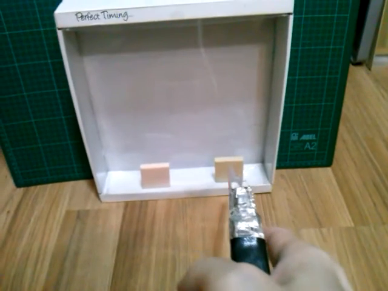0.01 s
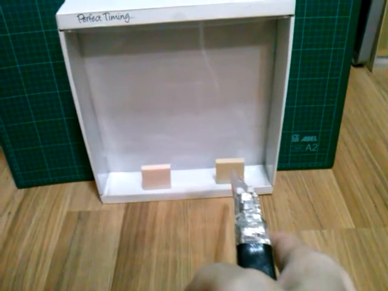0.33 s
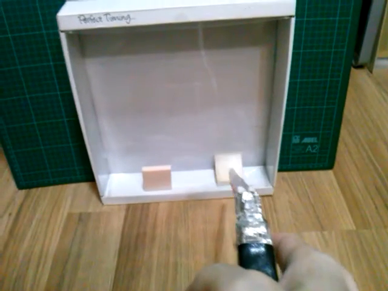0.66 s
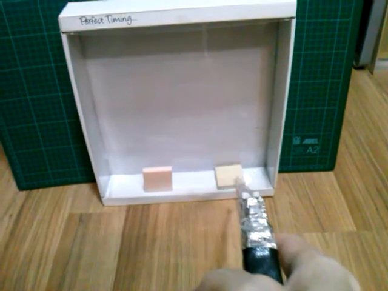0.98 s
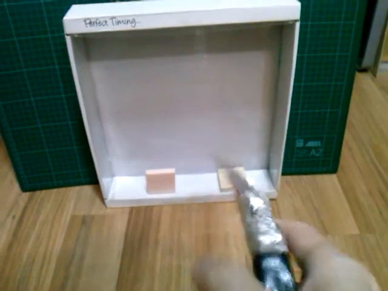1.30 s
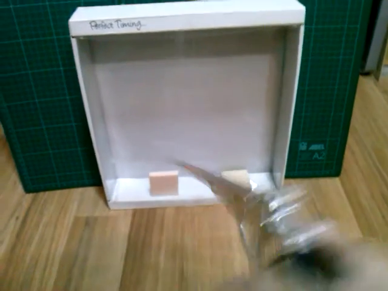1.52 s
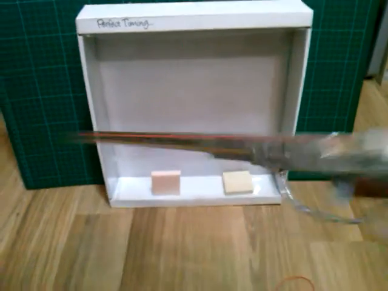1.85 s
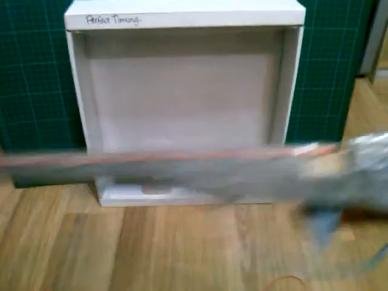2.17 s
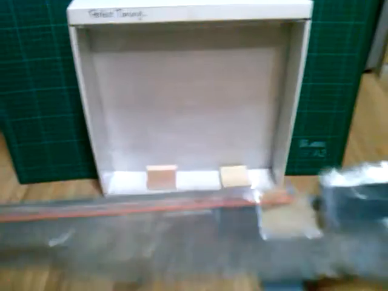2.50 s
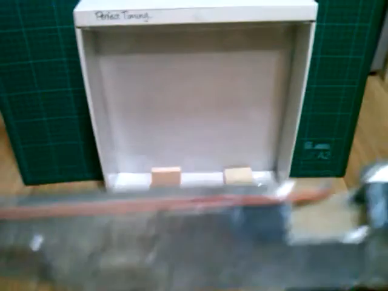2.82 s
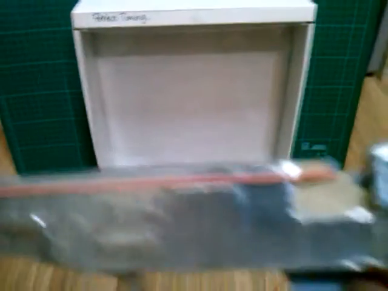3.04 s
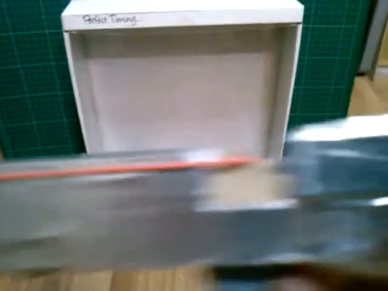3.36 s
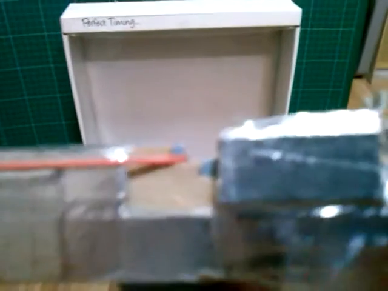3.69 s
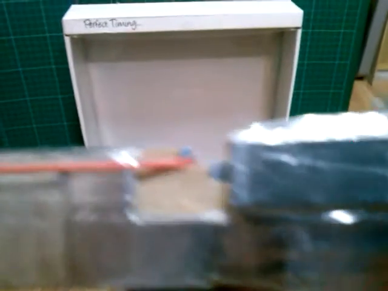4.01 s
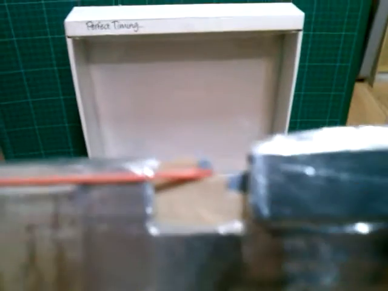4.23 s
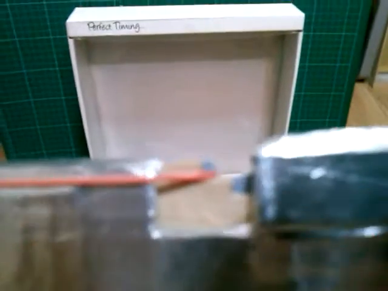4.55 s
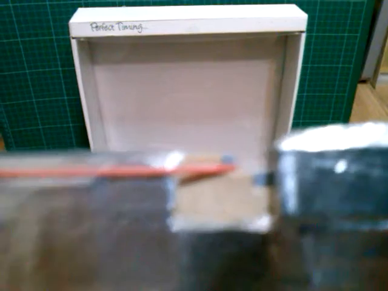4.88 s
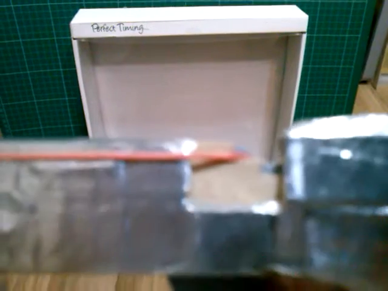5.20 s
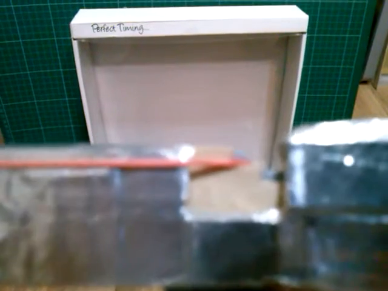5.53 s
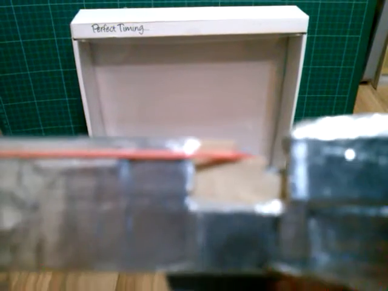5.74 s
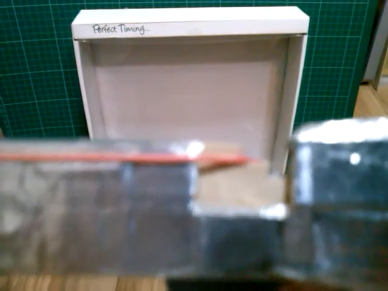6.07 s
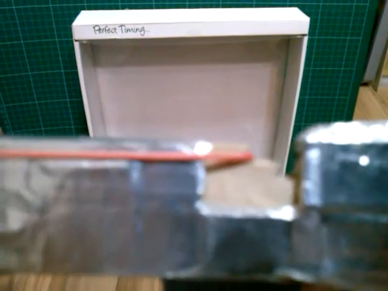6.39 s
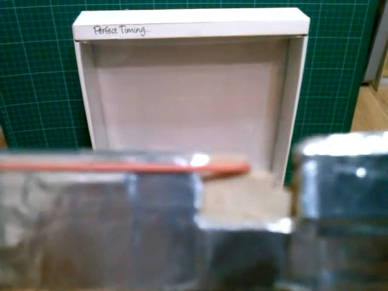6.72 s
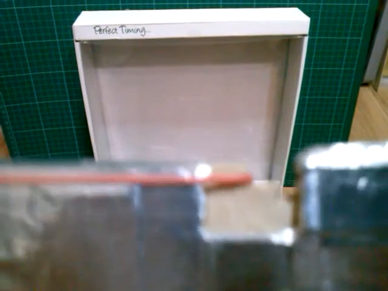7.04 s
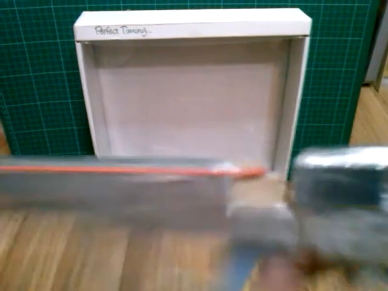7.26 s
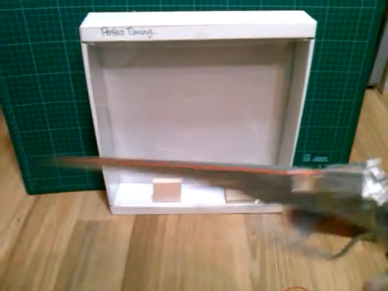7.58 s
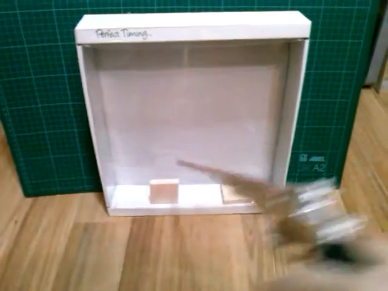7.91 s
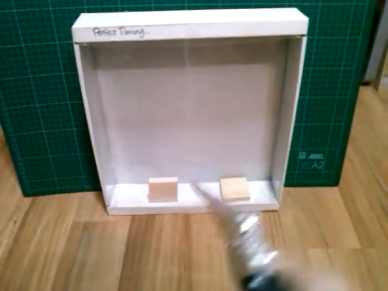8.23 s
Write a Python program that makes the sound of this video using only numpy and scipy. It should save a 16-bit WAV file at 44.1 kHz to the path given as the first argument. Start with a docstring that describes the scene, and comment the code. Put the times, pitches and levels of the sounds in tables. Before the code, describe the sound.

A fan hums in a small room throughout, a quiet rush of air with steady motor tones. At about 0.6 seconds a rubber band gun fires: the catch snaps, the band whips along the barrel and slaps a small block, all in one sharp, bright crack with a short room echo. The block lands twice in a cardboard box with hollow ticks and rocks to rest by 0.9 seconds. A very faint low drone swells around 2 seconds, rising slightly in pitch, and fades. At about 4.4 and 4.5 seconds the gun gives two small creaks close to the microphone. A soft, low, distant bump follows near 5.6 seconds. At 6.2 seconds a light tick leads straight into another sharp snap of the catch. A hand rubs the gun faintly and briefly at about 7.4 seconds and again at 8.

```python
"""A fan hums in a small room, and goes on throughout. A foil-covered rubber band gun fires: the catch
snaps, the band whips along the barrel and slaps a small block, which tumbles in a cardboard box and
excites the damped modes of its panels. A faint drone swells. Close to the microphone the gun creaks twice
by stick-slip friction; a soft bump follows, the catch snaps once more and a hand rubs the gun."""
import sys
import numpy as np
from scipy import signal
from scipy.fft import rfft, irfft
from scipy.io import wavfile
from scipy.ndimage import uniform_filter1d

SR = 44100
rng = np.random.default_rng(int(sys.argv[2]) if len(sys.argv) > 2 else 0)


def unload_wav(signal):
    """Save mono or channel-first audio to the path in sys.argv[1] as 16-bit WAV at rate SR, clipped to [-1, 1]."""
    wavfile.write(
        sys.argv[1],
        SR,
        np.round(np.clip(np.atleast_2d(signal).T, -1, 1) * 32767).astype(np.int16),
    )


N = 363825
T = np.arange(N) / SR
HIT_T = T[:SR // 5]  # time axis of one impact

# steady tones of the fan motor: (frequency [Hz], rms level [dB])
FAN_TONES = [(323, -62), (646, -72), (920, -74.5), (1109, -75), (1292, -79.5), (1663, -82), (2584, -83),
             (2767, -83.5)]
# rush of air and microphone hiss: (frequency [Hz], relative spectral density [dB])
RUSH_SPECTRUM = [(20, -8), (45, -9.5), (60, -5.5), (110, -2.5), (160, -5.5), (220, -3), (300, -5),
                 (750, -1.5), (1000, -9.5), (1500, -11), (2500, -16.5), (7000, -18.5), (10000, -20.5),
                 (15800, -22.5)]
# room and fan housing resonances in the rush: (frequency [Hz], width [Hz], gain [dB])
RUSH_PEAKS = [(66.2, 12, 4.5), (90, 10, -2.5), (120.9, 12, 5.5), (395.73, 27, 2.5), (486, 33, -6),
              (660, 390, -2), (4229.5, 500, 2), (8200, 800, 2)]
# the room's diffuse tail: (frequency [Hz], gain [dB], t60 [s])
REVERB_BANDS = [(150, -11, 0.29), (350, -6, 0.31), (801, -12.5, 0.21), (1694, -8, 0.463),
                (5016, -9.5, 0.332), (10000, -11.5, 0.35), (15070, -8, 0.352)]
# reflections from nearby surfaces: (delay [s], gain [dB])
EARLY_ECHOES = [(.0011, -8.5), (.0031, -10), (.005, -13), (.0079, -22)]
# colour of those reflections: (frequency [Hz], relative level [dB])
ECHO_SPECTRUM = [(200, -7.5), (3000, -4), (11000, -1.5), (16000, 1)]
# the hand rubs the gun: (time [s], half length [s], frequency [Hz], width [Hz], level [dB])
HAND_RUBS = [(7.35, 0.045, 3400, 1496, -66.5), (7.37, .06, 10000, 3500, -71),
             (8.039, 0.048, 1000, 350, -62.5)]
# joints slip under the grip: (time [s], length [s], slip gap [s], first energy [dB], fall per slip [dB])
SLIP_RUNS = [(4.381, .033, .0094, -21, 5), (4.4725, .0055, .0016, -21.5, 0.5)]
# modes of the gun's joints: (frequency [Hz], relative level [dB], t60 [s])
GUN_JOINT_MODES = [(1710, -4.5, 0.016), (2500, -11, 0.0133), (3360, -1, 0.015), (4220, -4.5, 0.011),
                   (7500, -2, 0.0061)]
# noise of one slip: (frequency [Hz], relative level [dB])
SLIP_SPECTRUM = [(300, -25.5), (1500, -8), (3800, 5), (8000, 0), (10500, 1.5), (13000, -21), (16000, -23)]
# modes of the cardboard panels: (frequency [Hz], relative level [dB], t60 [s])
PANEL_MODES = [(148.4, -8, 0.031), (210, -15.5, 0.0553), (296, -9.5, 0.036), (366.4, -8.5, 0.076),
               (423.3, -19.5, 0.044), (708, -4, 0.03002), (813, 4.5, 0.04), (1075, 0.5, .04),
               (1263, -7, 0.029), (1402, -9.5, 0.017), (1657.7, -7.5, 0.032)]
# dense, quickly damped flexing of the cardboard: (frequency [Hz], relative level [dB])
FLEX_SPECTRUM = [(30, -37.5), (130, -6.5), (400, -5), (900, -3.5), (1800, -6.5), (3000, -17), (6000, -23),
                 (16000, -45)]
# tick of the block on the box: (frequency [Hz], relative level [dB])
TICK_SPECTRUM = [(30, -21), (150, -2), (700, 3), (2000, -2.5), (4000, -4.5), (6500, -8), (9500, -4),
                 (12500, -8.5), (16000, -21.5)]
# the block lands on an edge, then flat: (time [s], edge tick [dB], time to fall flat [s], flat thud [dB])
BLOCK_LANDINGS = [(.670, -1.5, .0035, 4), (0.7754, -8.5, .0016, -2)]
# modes of the block: (frequency [Hz], relative level [dB], t60 [s])
BLOCK_RESONANCES = [(640, -4, 0.022), (1052, -1.5, .02), (1258.7, -1, 0.023), (1720, 1, .016),
                    (2265.3, 1, .014), (2800, -1.5, .01), (4100, -4.5, .008)]
# slap of the rubber band: (frequency [Hz], relative level [dB])
SLAP_SPECTRUM = [(30, -37.5), (130, -11.5), (350, -6), (1300, 6.5), (4000, -9.5), (9000, -1), (16000, -14)]
# crack of a hard contact on the gun: (frequency [Hz], relative level [dB])
CRACK_SPECTRUM = [(30, -51), (200, -24.5), (800, -29), (2000, -20.5), (4000, -12.5), (7000, -5),
                  (9500, 0.5), (12500, -3.5), (16000, -9)]
# resonances of the gun's frame: (frequency [Hz], width [Hz], gain at depth 1 [dB])
FRAME_PEAKS = [(1352.2, 120, 2), (4860, 990, 1), (8310, 770, 2), (9750, 560, 1.5), (11560, 900, 2.5)]
# the catch slips and lets go: (time [s], energy [dB], tilt [dB/octave], resonance depth [ratio])
CATCH_CLICKS = [(.577, -6, -6.5, 1), (.579, 12, -5, 0.59), (.7495, -11.5, -7, 3.6), (6.171, -14.5, 4, 2),
                (6.2232, 7.5, -2.5, 2.8)]

RELEASE_S, BARREL_TIME_S, FLIGHT_TIME_S = .5811, .0046, .0065  # the band's journey to the block
MUZZLE_S = RELEASE_S + BARREL_TIME_S
THUMP_S = MUZZLE_S + .0014


def undb(db):
    """Amplitude ratio of a level in decibels."""
    return 10 ** (np.asarray(db) / 20)


def unit(x):
    """Normalisation to an energy of one."""
    return x / np.sqrt(np.sum(x ** 2))


def add(out, s, x):
    """Superposition: x joins out at time s."""
    i = int(s * SR)
    out[i:i + len(x)] += x[:len(out) - i]


def fade(t, t60):
    """Exponential decay by 60 dB in t60."""
    return np.exp(-np.log(1000) * t / t60)


def drift(rate_hz, size=N):
    """Random modulation with a spread near one."""
    knots = rng.standard_normal(1024)
    return np.interp(T[:size] * rate_hz, np.arange(len(knots)), knots)


def spectrum_db(points, hz, peaks=()):
    """Spectral envelope: points joined on a log-frequency axis, plus Gaussian resonances."""
    point_hz, db = np.transpose(points)
    resonances = sum(gain * np.exp(-((hz - at) / width) ** 2) for at, width, gain in peaks)
    return np.interp(np.log(hz + 1), np.log(point_hz), db) + resonances


def colour(x, db):
    """Minimum-phase filtering gives x the envelope db and keeps its attack sharp."""
    n, spectrum = len(x), rfft(x)
    own_power = uniform_filter1d(np.abs(spectrum) ** 2, size=41) + 1e-9
    cepstrum = irfft(np.log(undb(db) / np.sqrt(own_power)), n)
    cepstrum[1:n // 2] *= 2  # folding makes the filter causal
    cepstrum[n // 2 + 1:] = 0
    return irfft(spectrum * np.exp(rfft(cepstrum)), n)


def burst(t60, points, peaks=(), tilt_db=0):
    """Many tiny contacts sum to decaying noise; the tilt is per octave, above about 1 kHz."""
    hz = np.fft.rfftfreq(len(HIT_T), 1 / SR)
    noise = rng.standard_normal(len(HIT_T)) * fade(HIT_T, t60)
    return unit(colour(noise, spectrum_db(points, hz, peaks) + tilt_db * np.log2(1 + hz / 1000)))


def ring(modes):
    """Free vibration: damped modes whose strengths vary with the point of contact."""
    chance_db = 1.5 * rng.standard_normal(len(modes))
    out = np.zeros(len(HIT_T))
    for k, (hz, db, t60) in enumerate(modes):
        mode = unit(np.sin(2 * np.pi * hz * HIT_T) * fade(HIT_T, t60))
        out += (-1) ** k * undb(db + chance_db[k]) * mode
    return unit(out)


def fan(rush_db=-57, speed_wander=.0014497):
    """Broadband air noise lies under tones that follow the motor's nearly constant speed."""
    shape_db = spectrum_db(RUSH_SPECTRUM, np.fft.rfftfreq(N, 1 / SR), RUSH_PEAKS)
    rush = np.sqrt(N) * unit(irfft(rfft(rng.standard_normal(N)) * undb(shape_db), N))
    phase_per_hz = 2 * np.pi * np.cumsum(1 + speed_wander * drift(5)) / SR
    hum = np.sqrt(2) * sum(undb(db) * np.sin(hz * phase_per_hz) for hz, db in FAN_TONES)
    return undb(rush_db) * rush + undb(.4 * drift(2.1)) * hum


def drone(peak_s=2.05, width_s=.68, db=-63, centre_hz=119, octaves_per_s=.3):
    """A faint tone from beyond the room glides upward, modulated at random in pitch and level."""
    hz = centre_hz * 2 ** (octaves_per_s * (T - peak_s))
    phase = 2 * np.pi * np.cumsum(hz * (1 + .0203 * drift(12.93))) / SR
    swell = np.exp(-((T - peak_s) / width_s) ** 2)
    return undb(db + 2.5 * drift(9.103)) * swell * np.sin(phase)


def bump(peak_s=5.56, width_s=.066, db=-57, hz=64.5):
    """A low tone under a short Gaussian envelope is heard as a soft bump beyond the room."""
    return undb(db) * np.exp(-((T - peak_s) / width_s) ** 2) * np.sin(2 * np.pi * hz * T)


def room(x, build_s=.00676, smear_t60=.0032):
    """Reverberation by convolution: scattered early echoes and a diffuse tail, without direct sound."""
    t = T[:SR // 2]
    log_hz = np.log(np.fft.rfftfreq(len(t), 1 / SR) + 1)
    log_centres = np.log(np.array(REVERB_BANDS)[:, 0])
    noise = rfft(rng.standard_normal(len(t)))
    build_up = 1 - np.exp(-(t / build_s) ** 2)
    response = np.zeros(len(t))
    for share, (_, db, t60) in zip(np.eye(len(REVERB_BANDS)), REVERB_BANDS):
        band = irfft(noise * np.interp(log_hz, log_centres, share), len(t))
        response += undb(db) * band * unit(fade(t, t60) * build_up)
    for delay, db in EARLY_ECHOES:
        add(response, delay, undb(db) * burst(smear_t60, ECHO_SPECTRUM))
    return signal.fftconvolve(x, response)[:N]


def rustles(grain_db=3):
    """Sliding friction: the hand moves unevenly over the gun and makes bands of noise."""
    out, t = np.zeros(N), T[:SR // 2]
    middle, bins = t[-1] / 2, np.fft.rfftfreq(len(t), 1 / SR)
    for s, half_length, hz, width, db in HAND_RUBS:
        passband = np.exp(-((bins - hz) / width) ** 2)
        rub = irfft(rfft(rng.standard_normal(len(t))) * passband, len(t))
        swell = np.exp(-((t - middle) / half_length) ** 2)
        pressure = undb(db + grain_db * drift(122.3, len(t))) * swell
        add(out, s - middle, pressure * rub / np.std(rub))
    return out


def creaks(ring_db=-1, slip_t60=.0026):
    """Stick-slip friction: the joints tick in two short runs that weaken as the strain eases."""
    out = np.zeros(N)
    for s, length, gap, db, fall_db in SLIP_RUNS:
        for k, after in enumerate(np.arange(0, length, gap)):
            slip = unit(burst(slip_t60, SLIP_SPECTRUM) + undb(ring_db) * ring(GUN_JOINT_MODES))
            add(out, s + after, undb(db - k * fall_db) * slip)
    return out


def thud(contact_s, flex_db=-5, flex_t60=.02):
    """A force pulse drives the cardboard panels; a longer contact excites less treble."""
    panels = ring(PANEL_MODES) + undb(flex_db) * burst(flex_t60, FLEX_SPECTRUM)
    force = HIT_T * fade(HIT_T, contact_s)
    return unit(signal.fftconvolve(panels, force)[:len(HIT_T)])


def knock(thud_db, tick_db, tick_t60=.054):
    """An impact excites both bodies: the cardboard thuds and the block ticks."""
    return undb(thud_db) * thud(contact_s=.00059) + undb(tick_db) * burst(tick_t60, TICK_SPECTRUM)


def tumble(radiate_hz=100, rebound_s=.00359, rock_gap_s=.019, rock_fall_db=4):
    """Inelastic impacts: after the shot's thump the block lands twice and rocks to rest."""
    out = np.zeros(N)
    add(out, THUMP_S, undb(-9) * thud(contact_s=.0025))
    for s, tick_db, fall_s, thud_db in BLOCK_LANDINGS:
        add(out, s, knock(thud_db - 17, tick_db))  # the edge thuds less
        add(out, s + fall_s, knock(thud_db, tick_db - 10))  # the flat face ticks less
        add(out, s + fall_s + rebound_s, undb(thud_db - 7.5) * thud(contact_s=.0009))
    for k in range(4):
        rock = undb(-k * rock_fall_db) * knock(thud_db=-13, tick_db=-12.5)
        add(out, BLOCK_LANDINGS[-1][0] + (k + 1) * rock_gap_s, rock)
    # small panels radiate little bass
    return signal.lfilter(*signal.butter(1, radiate_hz, "high", fs=SR), out + 1e-18)


def slaps(flap_db=-4, flap_t60=.014, slap_t60=.0083, ring_db=-5, fold_gap_s=.0021):
    """The band flaps as it flies off, then folds against the block in three impacts that ring its modes."""
    out = np.zeros(N)
    add(out, THUMP_S, undb(flap_db) * burst(flap_t60, SLAP_SPECTRUM))
    for k, db in enumerate((-2, .5, -2)):
        slap = unit(burst(slap_t60, SLAP_SPECTRUM) + undb(ring_db) * ring(BLOCK_RESONANCES))
        add(out, MUZZLE_S + FLIGHT_TIME_S + k * fold_gap_s, undb(db) * slap)
    return out


def snap(t60, tilt_db, depth):
    """Source and filter: the frame's resonances colour a hard, bright crack."""
    frame = [(hz, width, depth * gain) for hz, width, gain in FRAME_PEAKS]
    return burst(t60, CRACK_SPECTRUM, frame, tilt_db)


def catch_clicks(t60=.0036):
    """Impulsive excitation: the catch jolts the frame as it slips and lets go."""
    out = np.zeros(N)
    for s, db, tilt_db, depth in CATCH_CLICKS:
        add(out, s, undb(db) * snap(t60, tilt_db, depth))
    return out


def whip(scrape_db=5, muzzle_db=12):
    """Release of elastic energy: the band scrapes along the barrel and cracks at the muzzle."""
    out = np.zeros(N)
    for s, db in (RELEASE_S, scrape_db), (MUZZLE_S, muzzle_db):
        add(out, s, undb(db) * snap(t60=.01006, tilt_db=-1, depth=1.13))
    return out


def scene(band_wet_db=3, box_wet_db=2, creak_wet_db=-9):
    """The reverberant share grows with distance: muzzle and box are further off, the creaks close."""
    catch, band, box, grip = catch_clicks(), whip(), slaps() + tumble(), creaks()
    reflections = room(catch + undb(creak_wet_db) * grip)
    reflections += undb(band_wet_db) * room(band) + undb(box_wet_db) * room(box)
    return (catch + band + box + grip + reflections + rustles() + fan() + drone() + bump())[None]


def record(dry, ceiling=.75, top_hz=15900, dc_offset=.0015):
    """Soft saturation rounds the peaks, a low-pass cuts the top and the signal sits slightly off zero."""
    rounded = ceiling * np.tanh(dry / ceiling)
    low_pass = signal.ellip(10, .1, 70, top_hz, fs=SR, output="sos")
    return dc_offset + signal.sosfilt(low_pass, rounded)


dry = scene()
out = record(dry)
unload_wav(out)
```